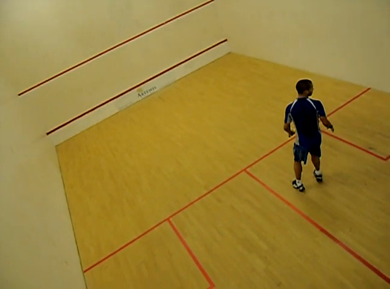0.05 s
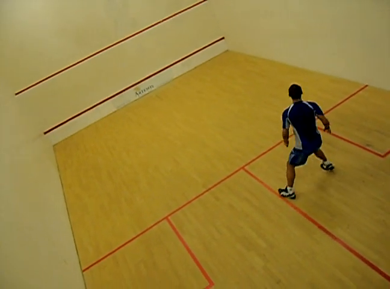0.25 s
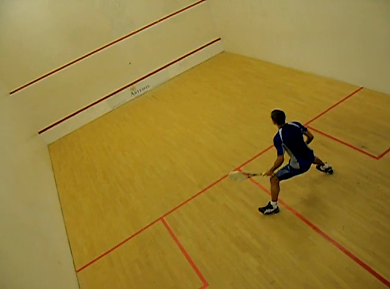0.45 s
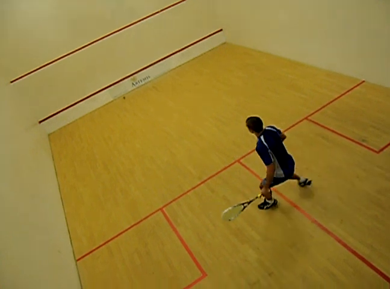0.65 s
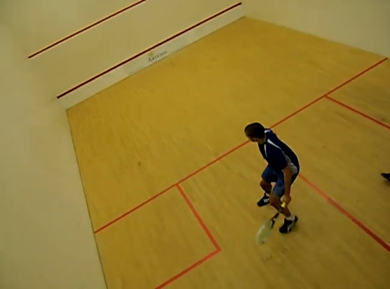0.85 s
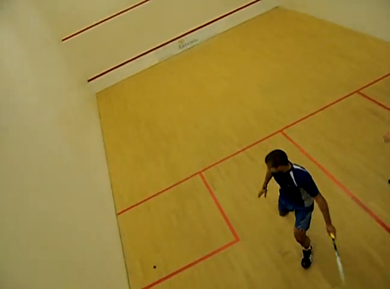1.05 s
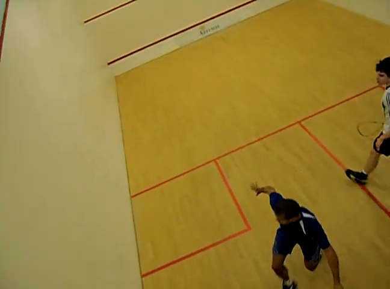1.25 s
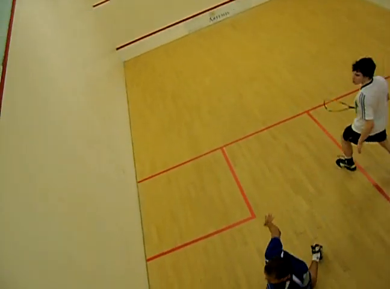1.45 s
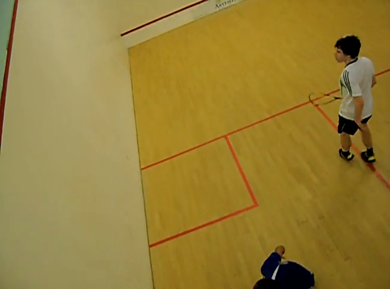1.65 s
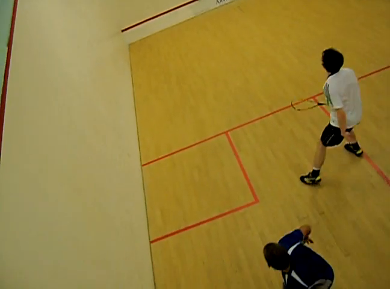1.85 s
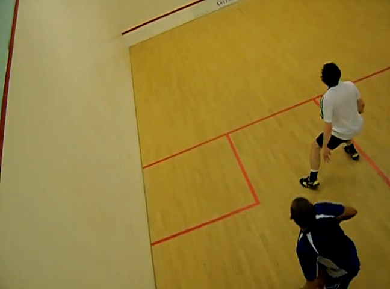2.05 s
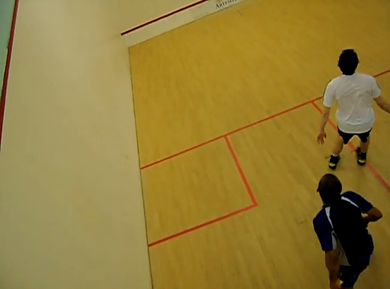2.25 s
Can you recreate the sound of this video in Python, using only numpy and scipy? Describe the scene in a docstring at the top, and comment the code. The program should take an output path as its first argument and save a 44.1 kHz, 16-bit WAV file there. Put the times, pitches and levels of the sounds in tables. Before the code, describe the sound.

A squash ball is hit with a quick racket swish at 0.2 seconds and cracks loudly against the front wall at 0.4, echoing long through the indoor court. From 0.9, feet thump softly on the wooden floor and soles tick. Near 1.6 a second swing ends in a close racket frame clack. A shoe squeaks sharply and stamps around 1.9, with a fainter squeak at 2.2, over faint room air.

```python
"""Over faint hall air, a racket swishes and drives a squash ball, which cracks against the front wall.
Feet thump on the sprung floor and soles tick; a second swing ends in a close clack of the racket frame,
then a rubber sole squeaks and stamps. Impacts are coloured clicks or noise bursts; strings and frame
ring in damped modes. The hard court answers each event with a long echo."""
import sys
import numpy as np
from scipy import signal
from scipy.fft import rfft, irfft, next_fast_len
from scipy.io import wavfile
from scipy.ndimage import uniform_filter1d

SR = 44100
rng = np.random.default_rng(int(sys.argv[2]) if len(sys.argv) > 2 else 0)


def file_out(sig):
    """Save sig as 16-bit WAV at sys.argv[1]."""
    # one column per channel
    cols = np.atleast_2d(sig).T
    # limit, then scale
    lim = np.clip(cols, -1, 1)
    pcm = np.round(lim * 32767).astype(np.int16)
    wavfile.write(sys.argv[1], SR, pcm)


N = 101429
TIME_S = np.arange(N) / SR


def amp(db):
    """Decibels to gain."""
    return 10 ** (np.asarray(db) / 20)


def unit_rms(x):
    """Scale to rms 1."""
    return x / np.sqrt(np.mean(x ** 2) + 1e-20)


def curve_at(points, hz):
    """Interpolate (f/Hz, value) points on a log frequency axis."""
    point_hz, values = np.transpose(points)
    return np.interp(np.log(hz + 1), np.log(point_hz + 1), values)


def noise(spectrum):
    """Coloured noise of rms 1."""
    gain = amp(curve_at(spectrum, np.fft.rfftfreq(N, 1 / SR)))
    return unit_rms(irfft(rfft(rng.standard_normal(N)) * gain, N))


def click(spectrum, size=4096):
    """Coloured minimum-phase click of energy 1."""
    gain = amp(curve_at(spectrum, np.fft.rfftfreq(size, 1 / SR)))
    cepstrum = irfft(np.log(gain))
    cepstrum[1:size // 2] *= 2
    cepstrum[size // 2 + 1:] = 0
    pulse = irfft(np.exp(rfft(cepstrum)))
    return pulse / np.linalg.norm(pulse)


def ring(modes):
    """Sum of damped modes, energy 1."""
    t = np.arange(SR // 4) / SR
    tone = sum(amp(db - 60 * t / t60_s) * np.cos(2 * np.pi * hz * t) for hz, db, t60_s in modes)
    return tone / np.linalg.norm(tone)


def place(start_s, x):
    """Track of N samples with x starting at start_s."""
    lead_in = np.zeros(round(start_s * SR))
    return np.concatenate([lead_in, x, np.zeros(N)])[:N]


# Court reverberation: f/Hz, t60/s
COURT_DECAY = [(60, 0.53), (250, 2.14), (700, 2.2), (2000, 2.06), (4000, 1.61), (7500, 1.16), (11000, 0.86)]


def court_echo(first_echoes_per_s=4000, mixing_s=0.06):
    """Separate reflections thicken into a tail; the midrange rings longest."""
    density = np.clip(first_echoes_per_s / SR + (TIME_S / mixing_s) ** 2, 1e-3, 1)
    diffuse = rng.standard_normal(N)
    strength = np.sign(diffuse) * (1 - density) + diffuse * density
    reflections = strength * (rng.random(N) < density) / np.sqrt(density)
    hz, frame_s, bands = signal.stft(reflections, SR, nperseg=256)
    decay = amp(-60 * frame_s / curve_at(COURT_DECAY, hz)[:, None])
    tail = signal.istft(bands * decay, SR, nperseg=256)[1][:N]
    return tail * np.clip((TIME_S - 0.002) / 0.0024, 0, 1)


def in_court(x, direct_db, room_db=0, walls=()):
    """Direct sound plus discrete wall reflections plus echo."""
    response = amp(room_db) * court_echo()
    response[0] += amp(direct_db)
    for delay_s, db in walls:
        response[round(delay_s * SR)] += amp(direct_db + db)
    return signal.fftconvolve(x, response)[:N]


def contact(spectrum, t60_s, direct_db, room_db=0, rise_s=0):
    """A rough, fast-dying contact and its echo, both coloured by what is struck."""
    attack = 1 - np.exp(-(TIME_S / (rise_s + 1 / SR)) ** 2)
    grit = rng.standard_normal(N) * attack * amp(-60 * TIME_S / t60_s)
    burst = amp(direct_db) * grit / np.linalg.norm(grit) + amp(room_db) * court_echo()
    return signal.fftconvolve(burst, click(spectrum))[:N]


# Air and rumble spectra: f/Hz, level/dB
AIR_SPECTRUM = [(15, -24), (25, -24), (71, -10), (107, -8), (327, -3.5), (564, -4.5), (1050, -12.5),
                (1260, -8), (1470, -14), (7770, -25), (12400, -33), (16100, -77), (22000, -120)]
RUMBLE_SPECTRUM = [(20, 22), (45, 16), (70, -2), (110, -9), (250, -28), (1000, -53)]
# Rumble envelope: t/s, level/dB
RUMBLE_ENVELOPE = [(0, -65), (.4, -59), (.7, -76), (.95, -63), (1.3, -66), (1.45, -51), (1.85, -55.5),
                   (2.3, -73)]


def hall_air(air_db=-48):
    """Steady hall air over a low rumble that swells and fades."""
    rumble_db = np.interp(TIME_S, *np.transpose(RUMBLE_ENVELOPE))
    return amp(air_db) * noise(AIR_SPECTRUM) + amp(rumble_db) * noise(RUMBLE_SPECTRUM)


# Swings: start/s, end/s, peak level/dB (before court gain)
RACKET_SWINGS = [(0.172, 0.185, -63.5), (1.537, 1.578, -74)]
# Air through strings: f/Hz, level/dB
SWISH_SPECTRUM = [(200, 14), (1000, 0.5), (2500, -3), (4000, 7), (5500, 5), (8000, -0.5), (10500, -2.5),
                  (12500, -46)]


def swishes(rise_db=9, release_t60_s=0.03):
    """Air hisses through the strings, louder as the racket speeds up."""
    hiss = np.zeros(N)
    for start_s, end_s, peak_db in RACKET_SWINGS:
        swell_db = rise_db * (TIME_S - end_s) / (end_s - start_s)
        release_db = -60 * (TIME_S - end_s) / release_t60_s
        hiss += amp(peak_db + np.minimum(swell_db, release_db)) * noise(SWISH_SPECTRUM)
    return in_court(hiss, direct_db=32.5)


# Strings on ball: f/Hz, level/dB
DRIVE_SPECTRUM = [(40, -31), (120, -14), (200, -5.5), (320, -3.5), (490, 1), (600, -10.5), (760, 2),
                  (980, -11.5), (1200, -4), (1450, -19), (1750, -11), (2200, -18.5), (3200, -22),
                  (6000, -20.5), (11000, -34.5)]
# Reflections of the stroke: delay/s, level/dB re direct
DRIVE_REFLECTIONS = [(.0045, -4), (.038, 4.5), (.056, 4), (.07, 5), (.103, 6)]
# String modes: f/Hz, level/dB, t60/s
STRING_MODES = [(530, -16, 0.096), (1177, 6, 0.093), (1430, 2, 0.055), (1810, -10, 0.054), (2525, -2, .05)]


def drive():
    """The racket hits the ball and its strings ring on."""
    hit = amp(-24) * in_court(click(DRIVE_SPECTRUM), direct_db=14.5, walls=DRIVE_REFLECTIONS)
    strings = amp(-41.5) * in_court(ring(STRING_MODES), direct_db=40)
    return place(0.192, hit) + place(0.195, strings)


# Footfalls: t/s, relative level/dB, centre f/Hz
FOOTFALLS = [(0.219, -51, 80), (0.862, -47.5, 253), (.99, -44, 219), (.995, -40, 178), (1.04, -38.5, 182),
             (1.365, -50.5, 327), (1.4, -44.5, 130.2), (1.425, -49, 135), (1.567, -48, 173),
             (1.948, -35, 246), (1.966, -39, 273)]


def footsteps(spacing_oct=0.33):
    """Sprung boards boom in one broad band under each step."""
    out = np.zeros(N)
    for start_s, db, centre_hz in FOOTFALLS:
        boards = [(centre_hz * 2 ** (k * spacing_oct), -4 * k * k) for k in range(-4, 5)]
        thump = contact(boards, t60_s=0.11, direct_db=35, room_db=-5, rise_s=0.0042)
        out += place(start_s, amp(db) * thump)
    return out


# Ball on wall: f/Hz, level/dB
CRACK_SPECTRUM = [(18, -70), (30, -29), (117, -24), (184, -18), (220, -27), (256, -12.5), (329, -11.5),
                  (531, -9.5), (633, -4.5), (756, 0), (1050, -8.5), (1160, -12), (1380, -23), (1610, -22.5),
                  (1870, -10.5), (2730, -13.5), (3180, -22), (3890, -18), (10100, -21.5), (11500, -32),
                  (12400, -31), (16100, -85), (22000, -120)]
# Nearest surfaces: delay/s, level/dB re direct
CRACK_REFLECTIONS = [(.0029, -1.5), (.0055, -1.5), (.007, 4), (.0172, -11), (.0242, -2)]


def wall_crack():
    """The ball slaps the front wall; nearby surfaces repeat the crack."""
    crack = in_court(click(CRACK_SPECTRUM), direct_db=22, walls=CRACK_REFLECTIONS)
    return place(0.3852, amp(-16) * crack)


# Light shoe contacts: t/s, relative level/dB
SHOE_TICKS = [(1.235, -57), (1.291, -54.5), (1.3169, -48.5), (1.416, -51.5), (1.471, -55)]
# Sole on varnish: f/Hz, level/dB
SCUFF_SPECTRUM = [(300, 6), (2000, 1), (4200, -5), (9000, -6), (12500, -19)]


def shoe_ticks():
    """Soles tick lightly on the varnish."""
    return sum(place(start_s, amp(db) * contact(SCUFF_SPECTRUM, t60_s=0.036, direct_db=32.5))
               for start_s, db in SHOE_TICKS)


# Frame contacts: t/s, relative level/dB
FRAME_HITS = [(1.568, -36.5), (1.572, -35), (1.5744, -35)]
# Frame clack: f/Hz, level/dB
CLACK_SPECTRUM = [(40, -17), (100, 0), (180, 3.5), (380, 11), (800, 7.5), (1500, -1.5), (2700, -1.5),
                  (3600, 1.5), (5200, 4), (8000, 0.5), (10300, -2), (12500, -19)]
# Frame modes: f/Hz, level/dB, t60/s
FRAME_MODES = [(470, 3, 0.03), (1255, -1.5, 0.076), (1400, 3, 0.032), (2047, 6, 0.042), (2060, -21, .05),
               (3380, -2, 0.043), (3924, 3, 0.045), (5560, -9, .04)]


def frame_clack():
    """The racket frame clatters close by and rings with a short ping."""
    clatter = np.zeros(N)
    for start_s, db in FRAME_HITS:
        clack = contact(CLACK_SPECTRUM, t60_s=0.024, direct_db=33.5, room_db=0.5)
        clatter += place(start_s, amp(db) * clack)
    ping = amp(-32.5) * in_court(ring(FRAME_MODES), direct_db=29.5, room_db=-9)
    return clatter + place(1.5765, ping)


# Skids: t/s, length/s, level/dB, f/Hz, rms jitter/fraction of f
SKIDS = [(1.8965, 0.0076, -29, 5610, .03), (1.907, 0.03, -42.5, 5570, 0.022),
         (1.928, 0.016, -39.5, 5620, 0.0198), (2.218, 0.084, -47.5, 2690, 0.02)]


def squeaks(upper_ratio=1.42, upper_db=-17, hiss_db=-9):
    """Rubber sticks and slips: an unsteady high whistle with some hiss."""
    out = np.zeros(N)
    for start_s, length_s, db, hz, jitter in SKIDS:
        waver = unit_rms(uniform_filter1d(rng.standard_normal(N), size=30))
        phase = 2 * np.pi * np.cumsum(hz * (1 + jitter * waver)) / SR
        whistle = unit_rms(np.sin(phase) + amp(upper_db) * np.sin(upper_ratio * phase))
        envelope = np.sin(np.pi * np.clip((TIME_S - start_s) / length_s, 0, 1))
        out += amp(db) * envelope * (whistle + amp(hiss_db) * noise(SCUFF_SPECTRUM))
    return in_court(out, direct_db=0, room_db=-33)


# Heel and sole landings: t/s, relative level/dB
SOLE_HITS = [(1.9394, -33.5), (1.951, -32.5), (1.9599, -36.5)]
# Sole slap: f/Hz, level/dB
SOLE_SPECTRUM = [(40, -24), (150, -15), (370, 4), (700, 0), (1100, -2.5), (1500, -5.5), (2100, -5.5),
                 (3300, -12), (6000, -11.5), (10000, -16), (12500, -29)]


def stamp():
    """Heel and sole slap down in quick succession."""
    return sum(place(start_s, amp(db) * contact(SOLE_SPECTRUM, t60_s=0.035, direct_db=31.5))
               for start_s, db in SOLE_HITS)


def scene():
    """The rally in mono, heard from above the back of the court."""
    return (hall_air() + swishes() + drive() + footsteps() + wall_crack()
            + shoe_ticks() + frame_clack() + squeaks() + stamp())[None]


def record(dry):
    """Round off the highest peaks and cut the top treble."""
    ceiling, cutoff_hz = 0.75, 12550
    limited = dry / (1 + np.abs(dry / ceiling) ** 6) ** (1 / 6)
    size = next_fast_len(N + SR // 2)
    hz = np.fft.rfftfreq(size, 1 / SR)
    roll_off = amp(curve_at([(10500, -0.5), (11500, -5.5), (12300, -18)], hz))
    return irfft(rfft(limited, size) * roll_off * (hz < cutoff_hz), size)[..., :N]


dry = scene()
out = record(dry)
file_out(out)
```